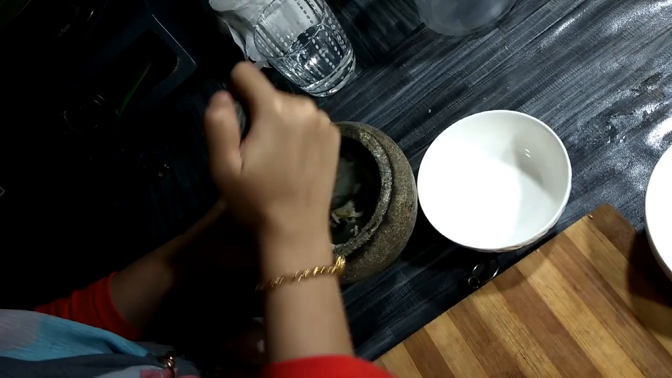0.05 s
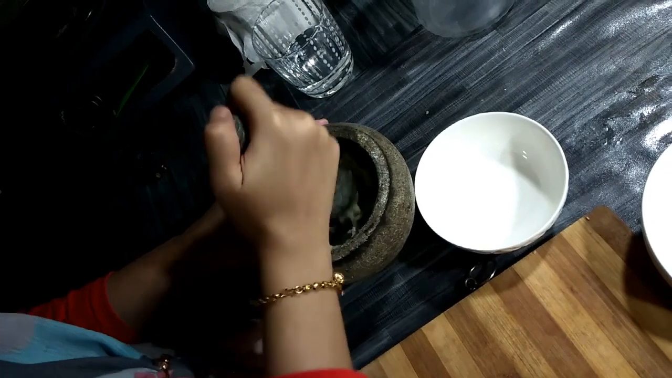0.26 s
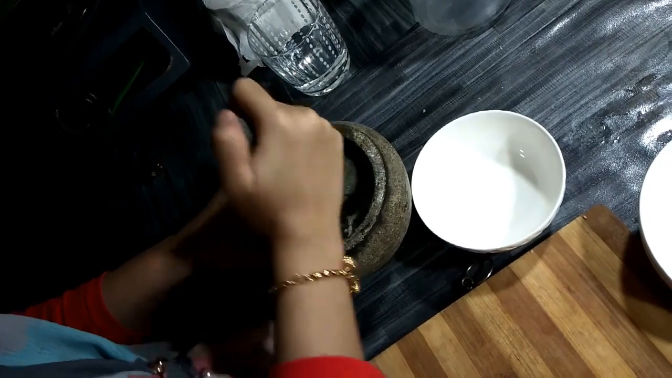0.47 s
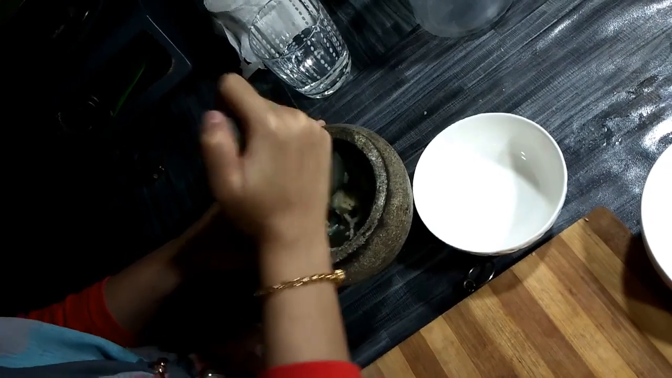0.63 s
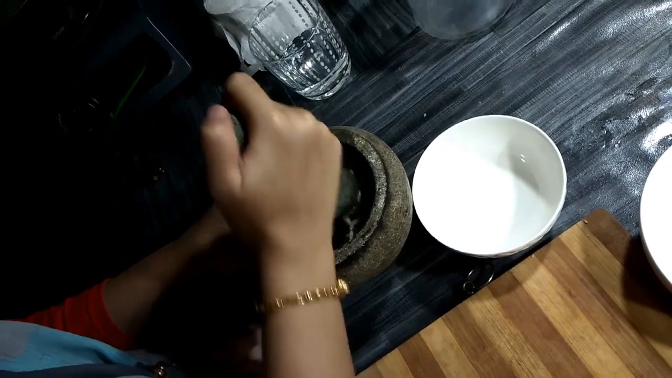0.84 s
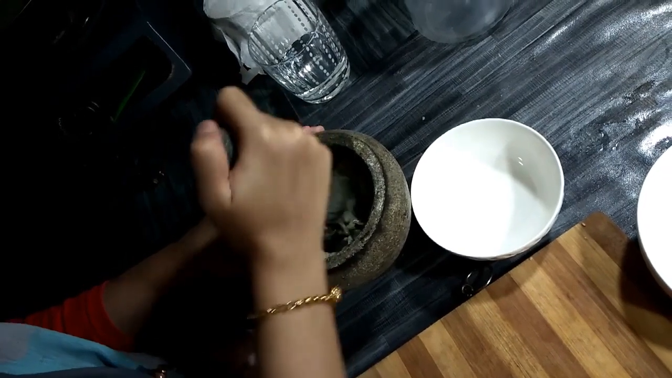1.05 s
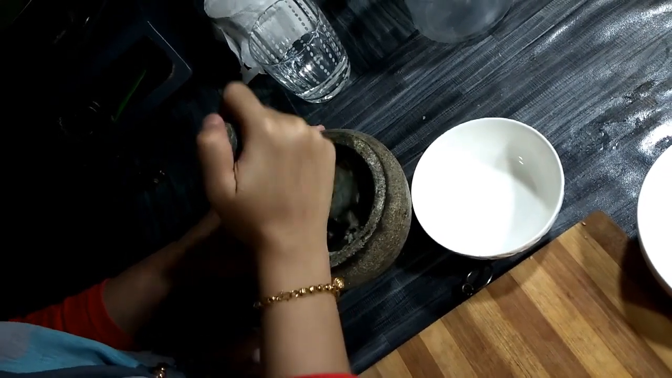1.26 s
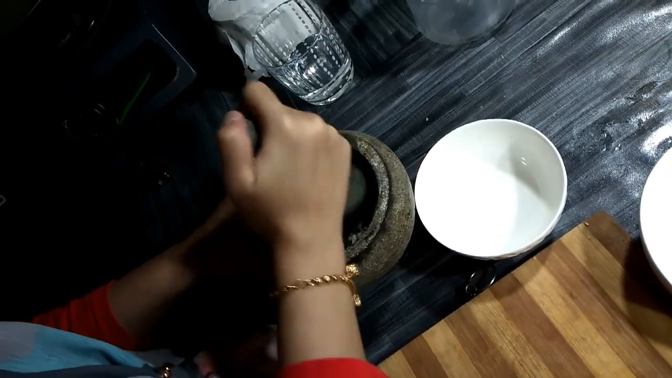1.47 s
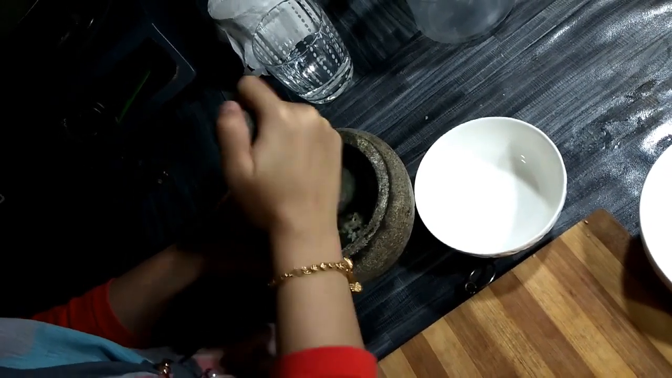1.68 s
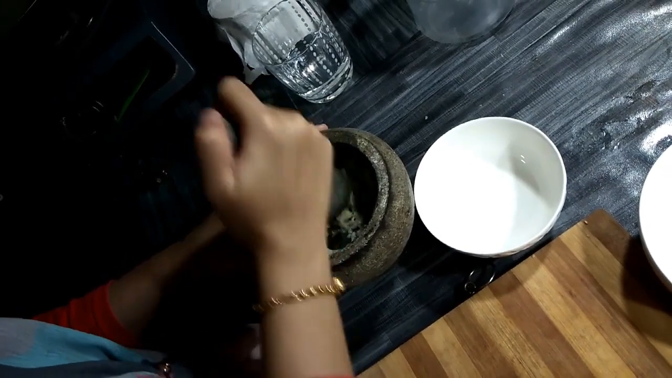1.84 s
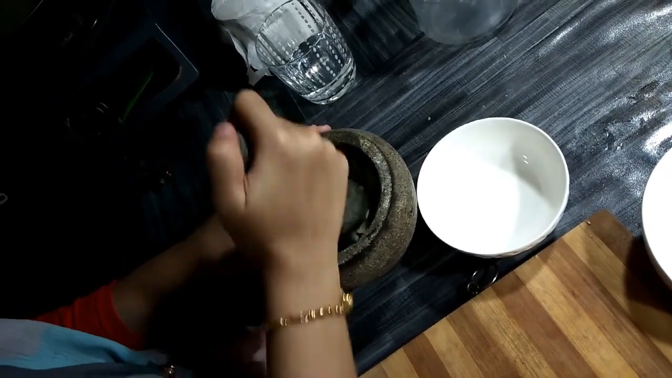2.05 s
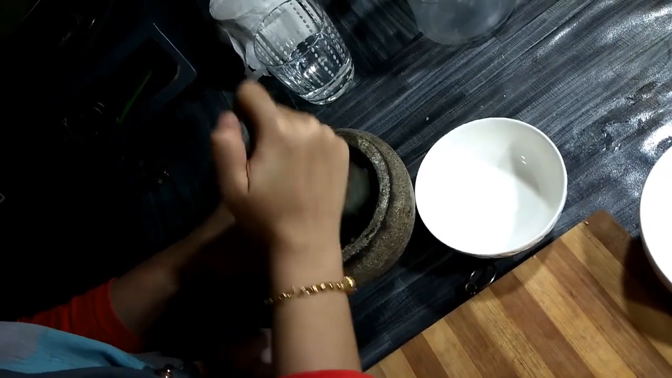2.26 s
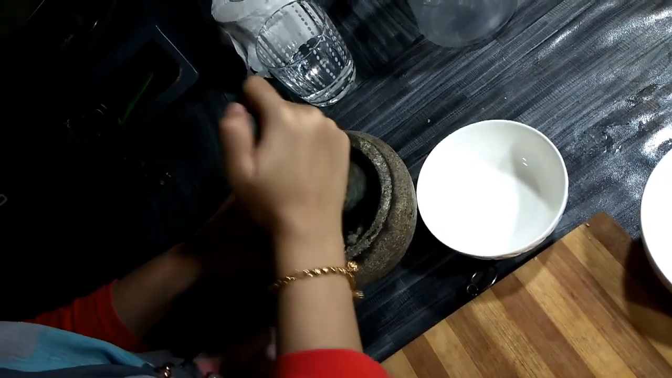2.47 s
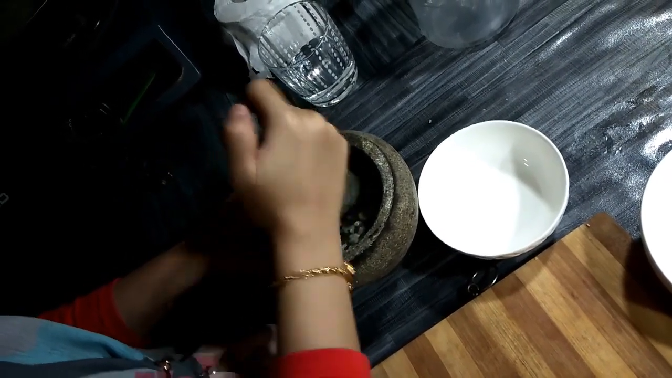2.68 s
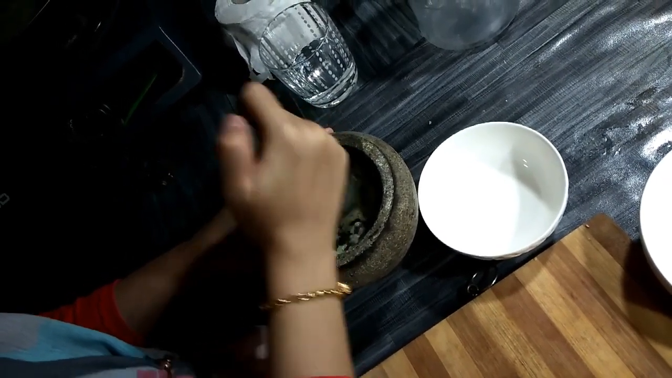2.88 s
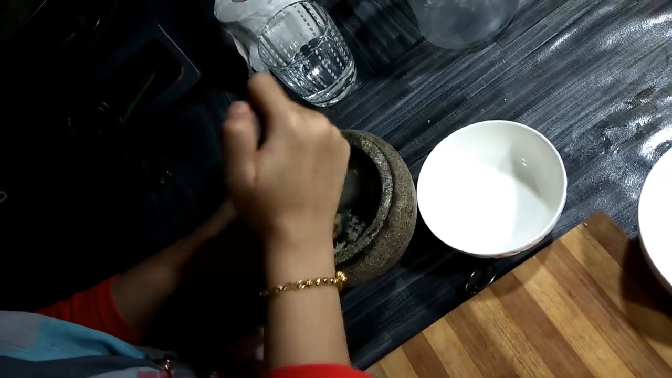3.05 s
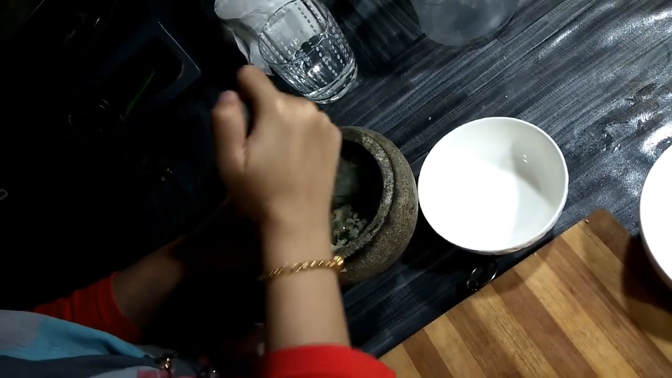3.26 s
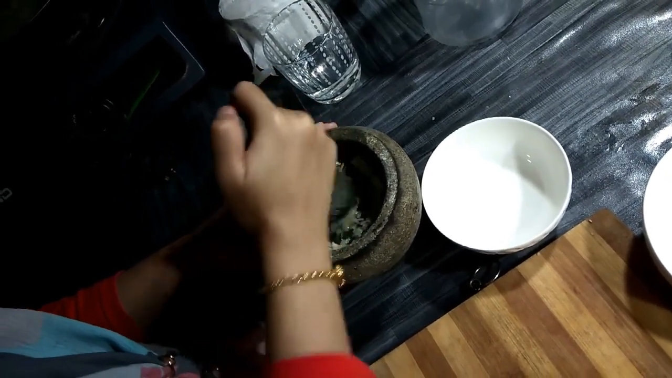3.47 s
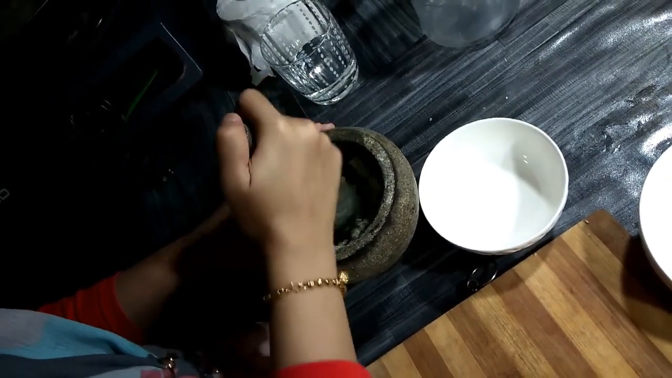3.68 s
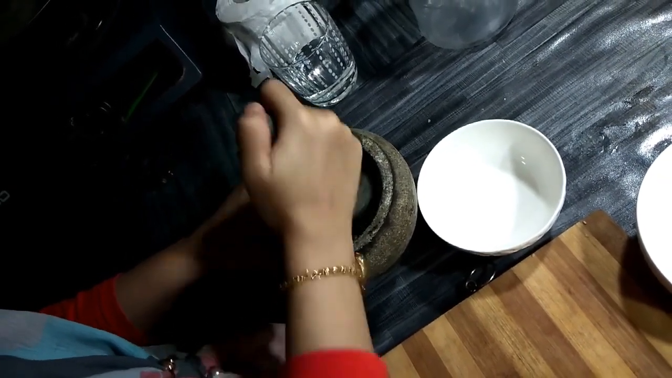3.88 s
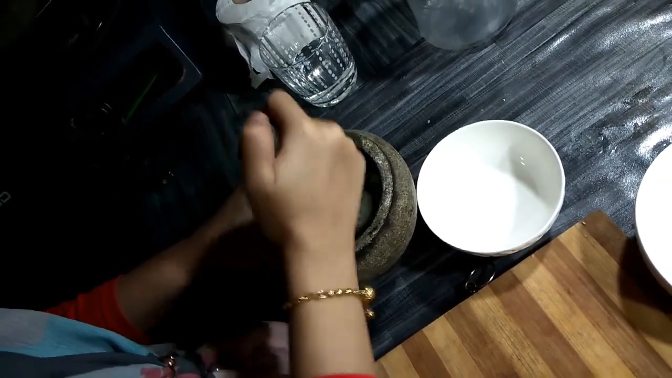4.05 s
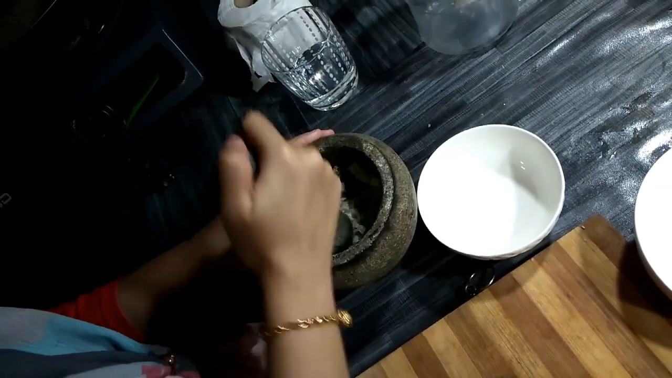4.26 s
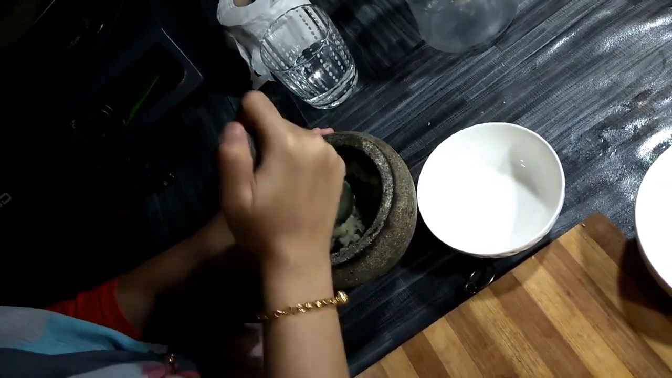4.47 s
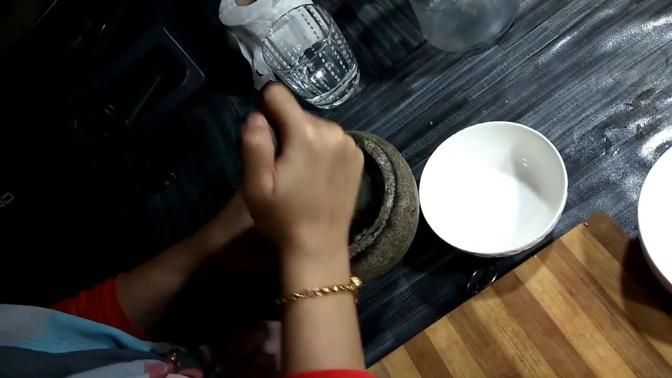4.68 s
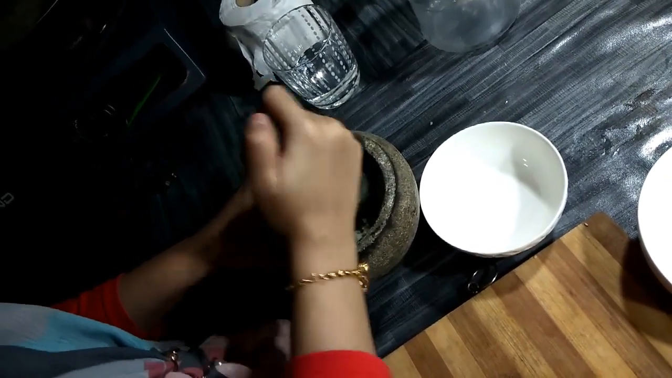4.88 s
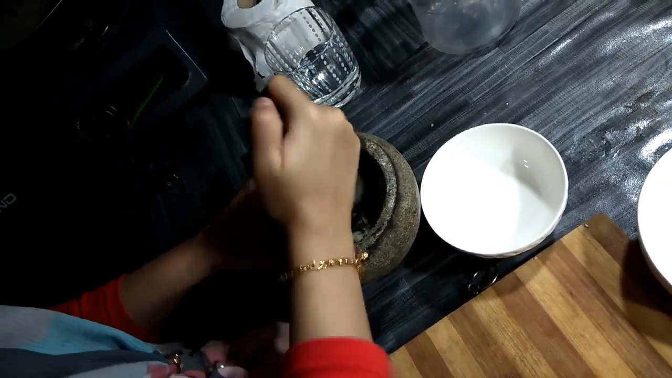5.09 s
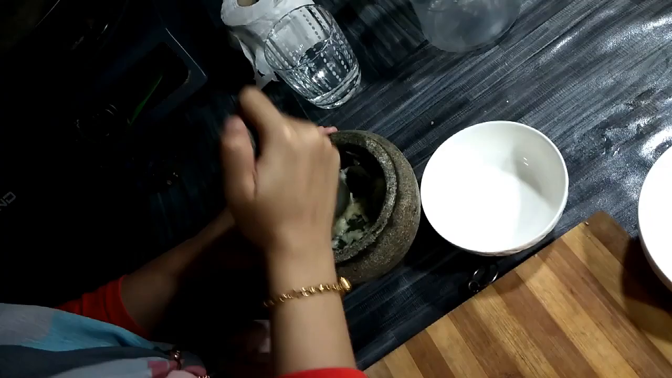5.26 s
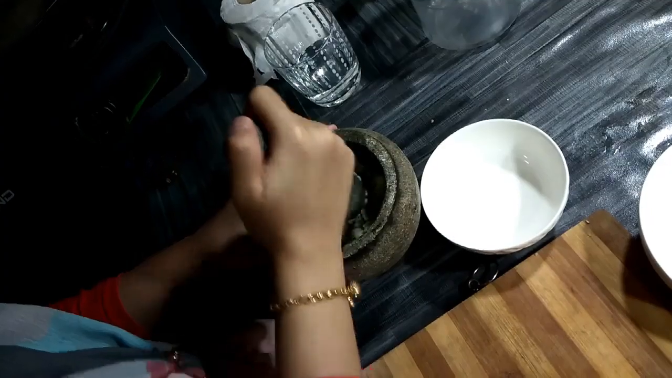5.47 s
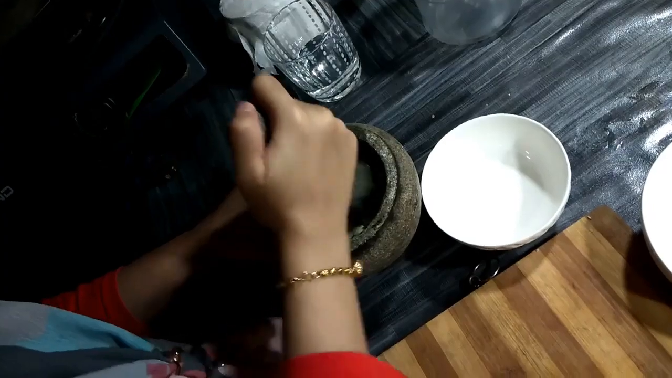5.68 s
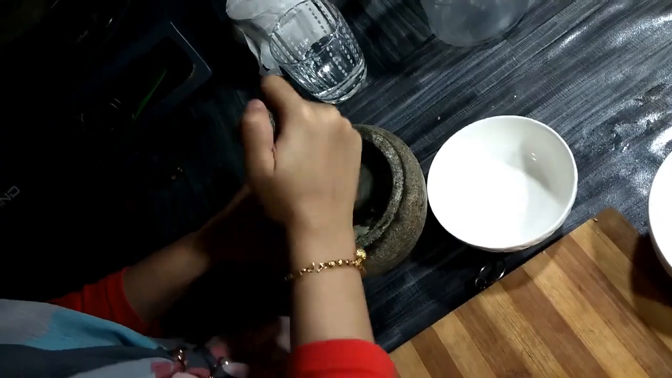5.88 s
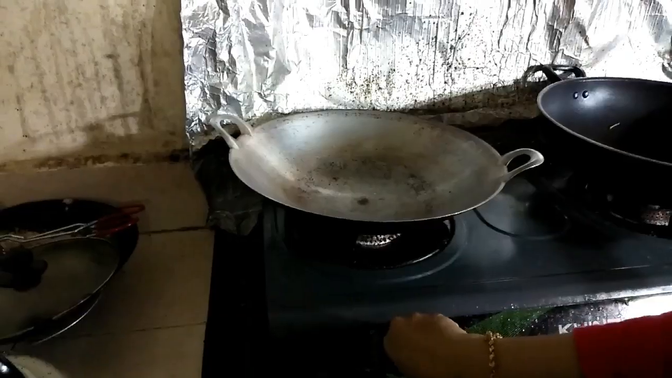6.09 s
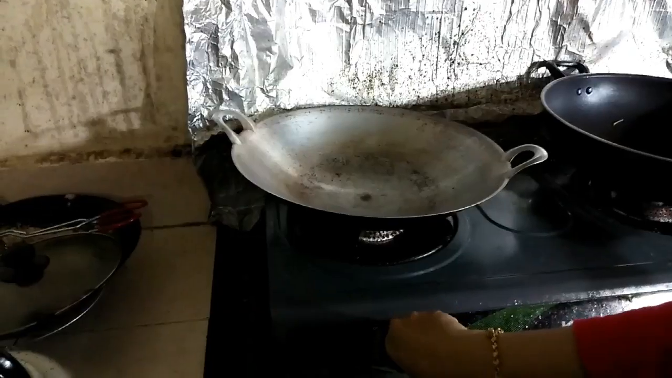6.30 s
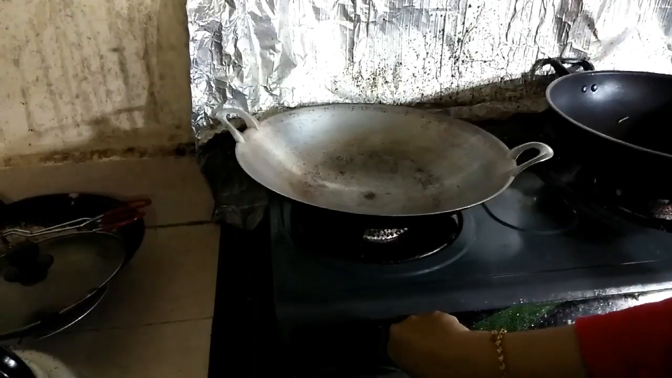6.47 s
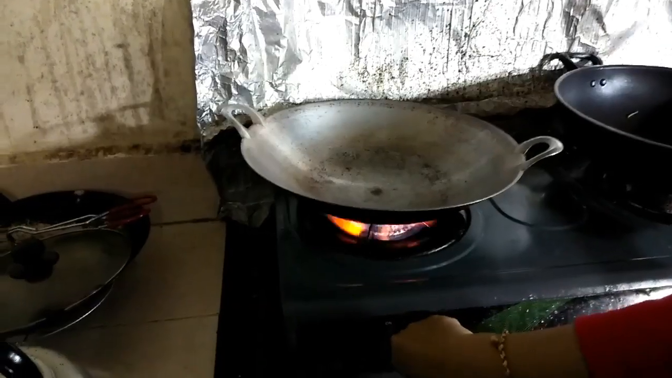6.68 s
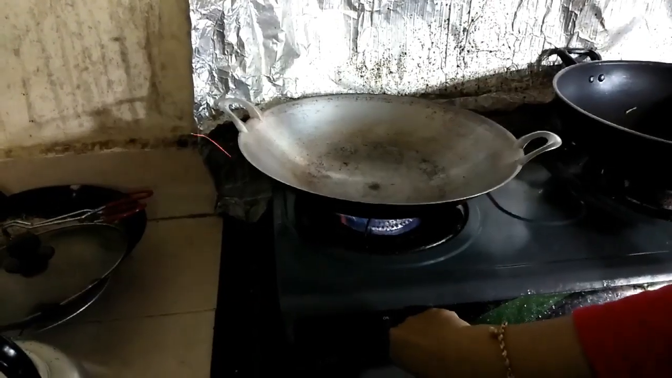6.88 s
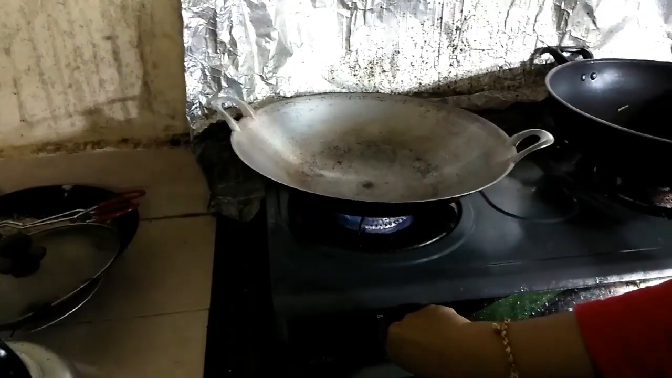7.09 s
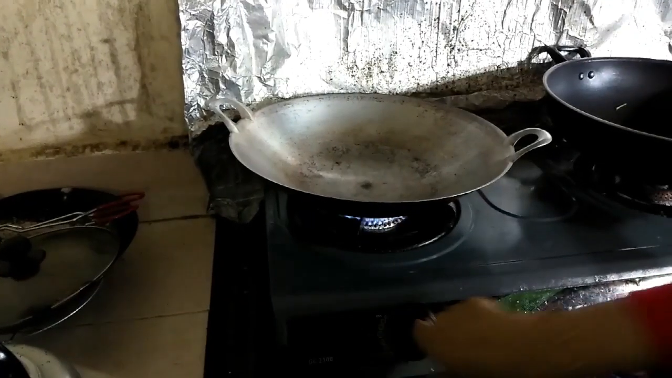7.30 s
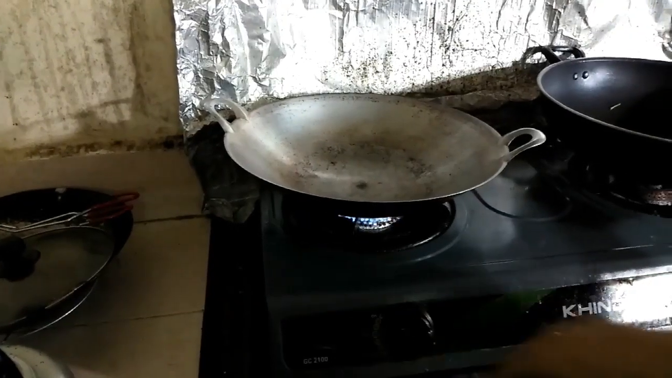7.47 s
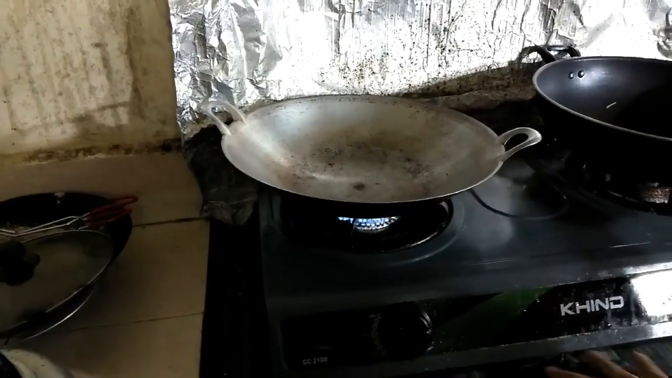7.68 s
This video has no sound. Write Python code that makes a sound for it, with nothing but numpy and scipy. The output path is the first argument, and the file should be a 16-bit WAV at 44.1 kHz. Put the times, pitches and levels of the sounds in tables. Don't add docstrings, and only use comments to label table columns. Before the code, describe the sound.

A pestle pounds garlic in a stone mortar with wet crunches, knocks, glass rattle and bracelet tinkle, then a gas stove snaps alight.

```python
import sys
import numpy as np
from scipy import signal
from scipy.fft import rfft, irfft, next_fast_len
from scipy.io import wavfile
from scipy.ndimage import uniform_filter1d, map_coordinates

SR = 44100
rng = np.random.default_rng(int(sys.argv[2]) if len(sys.argv) > 2 else 0)


def persist_wave(psi):
    counts = np.round(np.clip(psi, -1, 1) * 32767).astype(np.int16)
    wavfile.write(sys.argv[1], SR, np.atleast_2d(counts).T)


def amplitude_ratio(level_db):
    exponent = np.asarray(level_db, float) / 20
    return 10 ** exponent


N = 341239
T = np.arange(N) / SR
CUT_S = 6.128

# pitch_hz, level_db per Hz
AIR_COLOURS = [
    [(15, -38), (65, -9), (100, -1.5), (240, -8.5), (300, -14), (900, -28), (1800, -17), (3350, -23.5),
     (3800, -38.5), (4300, -33), (6800, -31.5), (9000, -39.5), (12000, -56), (15500, -55)],
    [(15, -55), (50, -18), (100, -1), (300, -15.5), (900, -24), (1800, -15), (3800, -22.5), (4200, -38),
     (5200, -28), (6700, -29), (7800, -34.5), (9070, -32.5), (12000, -51), (15500, -48)],
]
AIR_LEVELS = [-47.5, -51.5]
# pitch_hz, width_hz, level_db
HISS_BANDS = [(4684, 160, -7.5), (5410, 91, -11), (6810, 500, -6), (7850, 200, -12), (8600, 200, -16)]
# time_s, pitch_hz, level_db
WHINE_PATH = [(0, 1588, -49), (0.801, 1590, -49), (1.051, 1700, -52), (1.17, 1720, -50), (1.4, 1450, -47),
              (1.65, 1468, -47), (1.85, 1753, -57.5), (2.1, 1700, -50), (2.5, 1580, -50), (4, 1591, -50),
              (4.6, 1620, -52), (5.1, 1556, -50), (5.4, 1650, -52), (6.122, 1650, -50), (6.134, 1790, -52),
              (6.62, 1952, -54), (7.1, 1766, -51.5), (7.74, 1770, -50.5)]
# multiple, width_hz, level_db
WHINE_ORDERS = [(1, 93, 1), (1.9, 207, -4.5)]
# delay_s, level_db
WALLS = [(.0018, -12), (.004, -11), (.0115, -8.5), (0.0088, -6.5), (0.0152, -8.5), (.024, -30), (.033, -18)]
# pitch_hz, t60_s
ROOM_DECAY = [(100, 0.7), (500, 0.5), (1500, 0.65), (3000, 0.61), (8000, 0.5), (15000, 0.48)]

# start_s, level_db, rattle_s, brightness_db per octave
IGNITER_SNAPS = [
    (6.731, -33, 0.0035, -4),
    (6.734, -10.5, 0.018, 2),
    (6.7445, -7, 0.0021, -3.5),
    (6.749, -14.5, 0.0097, -1.5),
    (6.757, -14, 0.0023, -3),
]
# start_s, level_db, rattle_s, brightness_db per octave
KNOB_CLICKS = [
    (7.436, -12, 0.013, 1.6),
    (7.448, -10, 0.0031, -1.5),
    (7.456, -37, 0.0049, -1.5),
]
# pitch_hz, level_db per Hz
IGNITER_COLOUR = [(40, -49), (75, -13), (276, -18), (474, -16.5), (1110, -11), (1240, -9.5), (2190, -7.5),
                  (2520, -8), (2970, -12.5), (4860, -19), (8540, -17), (15000, -38), (16500, -66)]
# pitch_hz, level_db per Hz
KNOB_COLOUR = [(59, -70), (100, -45), (324, -15), (669, -26), (1000, -12), (1240, -17), (1910, -2.5),
               (2630, -11.5), (3780, -18), (5090, -30.5), (7980, -28.5), (15100, -60), (16500, -83)]
# pitch_hz, level_db, t60_s
KNOB_MODES = [(1008, -30, .27), (1800, -15, .1), (1860, -28, .25), (340, -30, .08)]
# pitch_hz, level_db per Hz
FLAME_COLOUR = [(15, -19), (45, -8), (100, 1.5), (270, -0.5), (560, -7.5), (630, -9), (690, 0.5),
                (760, -9.5), (900, -16.5), (1400, -14.5), (3000, -57)]

# start_s, level_db
CHARM_STRIKES = [
    [(.1944, -55), (2.1605, -56), (4.337, -62), (4.5844, -57), (4.9894, -69), (5.3353, -59)],
    [(.0233, -61), (.1744, -57), (.3805, -51), (1.1644, -57), (1.4142, -52), (1.6344, -54), (2.6294, -59),
     (3.0964, -56), (3.1444, -54), (3.6162, -53)],
]
# pitch_hz, level_db, t60_s
CHARM_MODES = [
    [(5530, 9, 0.088), (13570, -14, .05)],
    [(8130, 3.5, .07), (15350, -26, .05)],
]
# start_s, level_db
BOWL_NUDGES = [
    (0.556, -47.5),
    (4.969, -34),
    (5.22, -51),
]
# pitch_hz, level_db, t60_s
BOWL_MODES = [(1243, 0, .5), (3120, -7, .25)]
# start_s, tone_db, clatter_db
GLASS_HOPS = [(0.0744, -38, -36), (0.3182, -39, -47), (.5781, -45, -42), (.84, -39, -36),
              (1.0846, -32.5, -35), (1.321, -34, -35), (1.565, -41.5, -39), (2.069, -32, -31),
              (2.8124, -38, -41), (3.0792, -37, -30), (3.3073, -48, -41), (3.528, -43, -47),
              (3.9946, -37, -33), (4.732, -31.5, -31), (5.246, -41, -48), (5.5104, -39, -33),
              (5.7555, -54, -33), (5.9933, -47, -31)]
# pitch_hz, level_db, t60_s
GLASS_TONE = [(4680, 0, .16), (4735, -6, .12)]
# pitch_hz, level_db, t60_s
GLASS_CLATTER = [(2720, -10, .06), (3610, -16, .07), (5990, -13, .07), (1830, -13, .2), (7600, -19, .05),
                 (9350, -19, .05), (10200, -25, .05), (12070, -25, .06), (14430, -27, .06)]

# start_s, knock_db, splat_db, boom_db, contact_ms
HARD_BLOWS = [
    (.816, -19.5, -34, -29, 0.74),
    (1.2936, -12, -28, -25, 0.71),
    (2.039, -25.5, -30, -25, 0.7),
    (2.283, -12, -22.5, -27, 0.63),
    (3.7235, -21.5, -41, -27.5, 0.76),
    (4.196, -28, -35.5, -35.5, 0.64),
    (4.413, -24.5, -38, -31.5, 0.63),
    (4.7044, -14.5, -27.5, -26, .64),
    (5.4851, -11, -30.5, -25, 0.69),
    (5.7274, -10, -24, -25.5, 0.67),
]
# start_s, knock_db, splat_db, boom_db, brightness_db per octave
CUSHIONED_BLOWS = [(.049, -39.5, -26, -27, 1.6), (.293, -37.5, -39, -29.5, 2),
                   (.556, -37, -28.5, -27.5, 0.8), (1.059, -32, -32, -25, 0.3),
                   (1.539, -38, -31.5, -28, -1.5), (1.772, -51, -31, -34, 0.8), (2.533, -41, -32, -29, 3),
                   (2.788, -37.5, -23, -27, 2.2), (3.052, -37, -26, -26, -1.5),
                   (3.284, -36.5, -23, -26.5, 6.5), (3.502, -31, -40.5, -29, 7),
                   (3.968, -34.5, -24.5, -26.5, 1), (4.964, -45, -25, -29.5, -0.4),
                   (5.2204, -39.5, -25, -28.5, 3.5), (5.966, -32.5, -36.5, -25.5, 0.5)]
# start_s, level_db
RIM_TAPS = [
    (2.522, -34),
    (4.969, -34.5),
]
# pitch_hz, level_db, t60_s
FLOOR_MODES = [(56.55, 2.5, 0.42), (63.35, 4.5, 0.32), (77.5, 8.5, 0.14), (100.6, 0.5, 0.31),
               (146.2, -2.5, 0.32), (152.1, -4, 0.32), (173.8, -1, 0.19), (233.4, -2.5, 0.17),
               (253, -18, 0.21), (305.5, -3.5, 0.14), (348.3, -5.5, 0.1), (396, -22, 0.19),
               (481.4, -11.5, 0.12)]
# pitch_hz, width_hz, level_db
STONE = [(1267, 192, -4.5), (1650, 390, -1.5), (2220, 700, 4), (2895, 304, 11)]
# pitch_hz, width_hz, level_db
BODY = [(252.5, 225, 3.5), (324.6, 93, 8), (409, 118, -0.5), (540, 81, 1), (642, 104, 1.5), (806, 150, 5),
        (914, 270, -0.5)]
# pitch_hz, level_db per Hz
SPLAT_COLOUR = [(880, -9.5), (1500, 4), (2210, -3), (2540, 2.5), (4160, -10), (6890, -7.5), (8320, -9),
                (11000, -19), (16000, -32)]
# pitch_hz, width_hz, level_db
POP = [(6730, 780, -4), (9750, 3100, -24), (5370, 910, -6.5), (2050, 350, 0.5)]

HARD_BRIGHT_DB = 1.9
USUAL_BOOM_DB = -26.5


def unit(x):
    return x / np.sqrt(np.mean(x ** 2) + 1e-20)


def along(points, hz):
    f, v = np.transpose(points)
    return np.interp(np.log(hz + 1), np.log(f + 1), v)


def tilted(spectrum, bright_db, pivot_hz):
    return [(hz, db + bright_db * np.log2(hz / pivot_hz)) for hz, db in spectrum]


def resonant(peaks, f):
    total = 0
    for k, (centre, width, db) in enumerate(peaks):
        damping = 1j * f * width
        total = total + (-1) ** k * amplitude_ratio(db) * damping / (centre * centre - f * f + damping)
    return total


def filtered(x, response):
    size = next_fast_len(len(x) + 8192)
    return irfft(rfft(x, size) * response(np.fft.rfftfreq(size, 1 / SR)), size)[:len(x)]


def noise(spectrum, size):
    return unit(filtered(rng.standard_normal(size), lambda hz: amplitude_ratio(along(spectrum, hz))))


def wobble(rate):
    knots = rng.standard_normal(int(N * rate / SR) + 4)
    return map_coordinates(knots, [T * rate])


def add(track, s, x):
    part = track[round(s * SR):][:len(x)]
    part += x[:len(part)]


def ring(modes, cycles, scatter_db):
    t = T[:round(SR * max(t60 for _, _, t60 in modes))]
    out = np.zeros(len(t))
    for hz, db, t60 in modes:
        swell = 1 - np.exp(-t * hz / cycles)
        strength = amplitude_ratio(db + scatter_db * rng.standard_normal())
        out += strength * swell * amplitude_ratio(-60 * t / t60) * np.sin(2 * np.pi * hz * t)
    return out


def puff(spectrum, rise, t60, grit_db):
    t = T[:SR // 8]
    grit = unit(uniform_filter1d(rng.standard_normal(len(t)), size=round(.0012 * SR)))
    burst = unit(amplitude_ratio(grit_db * grit) * noise(spectrum, len(t)))
    return burst * (1 - np.exp(-t / rise)) * amplitude_ratio(-60 * t / t60)


def in_room(x, wet_db, colour=None, echo_db=0):
    hz, t, z = signal.stft(rng.standard_normal(SR * 3 // 4), SR, nperseg=256)
    decay = amplitude_ratio(-60 * t / along(ROOM_DECAY, hz)[:, None])
    tail = signal.istft(z * decay, SR, nperseg=256)[1]
    tail *= 1 - np.exp(-T[:len(tail)] / 0.00087)
    echoes = np.zeros(len(tail))
    echoes[0] = 1
    for s, db in WALLS:
        echoes[round(s * SR)] += amplitude_ratio(db + echo_db)
    if colour is None:
        return signal.fftconvolve(x, echoes + tail * amplitude_ratio(wet_db) / np.linalg.norm(tail))
    tail = filtered(tail, lambda f: amplitude_ratio(along(colour, f)))
    wet = tail * amplitude_ratio(wet_db) * np.linalg.norm(x) / np.linalg.norm(tail)
    return signal.fftconvolve(x, echoes)[:len(tail)] + wet


def room_air(level_db, colour):
    return amplitude_ratio(level_db + 0.63 * wobble(5.9)) * noise(colour, N)


def appliance():
    def bands(f):
        return sum(resonant([(hz, width, db / 2)], f) ** 2 for hz, width, db in HISS_BANDS)

    hiss = unit(filtered(rng.standard_normal(N), bands))
    return amplitude_ratio(-65.0 + 0.88 * wobble(3.4)) * hiss


def whine():
    s, hz, db = np.transpose(WHINE_PATH)
    phase = 2 * np.pi * np.cumsum(np.interp(T, s, hz)) / SR
    out = np.zeros(N)
    for multiple, width_hz, level_db in WHINE_ORDERS:
        def lowpass(f):
            return 1 / (1 + (f / width_hz) ** 2)

        a = unit(filtered(rng.standard_normal(N), lowpass))
        b = unit(filtered(rng.standard_normal(N), lowpass))
        band = a * np.cos(multiple * phase) + b * np.sin(multiple * phase)
        out += amplitude_ratio(level_db + 0.17 * wobble(5.0)) * band
    return amplitude_ratio(np.interp(T, s, db)) * unit(out)


def snaps(rows, colour, modes, wet_db):
    dry = np.zeros(SR // 2)
    first = rows[0][0]
    for s, db, rattle_s, bright_db in rows:
        bright = tilted(colour, bright_db, pivot_hz=3000)
        add(dry, s - first, amplitude_ratio(db) * puff(bright, rise=0.00062, t60=5 * rattle_s, grit_db=-0.4))
    out = np.zeros(N)
    add(out, first, in_room(dry, wet_db, colour, echo_db=-8.5))
    add(out, first + .004, ring(modes, cycles=3, scatter_db=0))
    return out


def flame():
    catch_s, catch_rise_s, flare_db, flare_s = 6.74, 0.024, 12.5, 0.18
    turned_down_s, down_db_per_s = 7.5, 52
    lit = np.maximum(T - catch_s, 0)
    level_db = -48.5 + flare_db * np.exp(-lit / flare_s)
    level_db = level_db - down_db_per_s * np.maximum(T - turned_down_s, 0)
    flutter = amplitude_ratio(level_db + 2.5 * wobble(15)) * noise(FLAME_COLOUR, N)
    return flutter * (1 - np.exp(-(lit / catch_rise_s) ** 2))


def stove():
    igniter = snaps(IGNITER_SNAPS, IGNITER_COLOUR, [(2490, -42, .06)], wet_db=-1.5)
    knob = snaps(KNOB_CLICKS, KNOB_COLOUR, KNOB_MODES, wet_db=-3.0)
    return flame() + igniter + knob


def blows():
    hard = [(s, splat, boom, HARD_BRIGHT_DB) for s, _, splat, boom, _ in HARD_BLOWS]
    cushioned = [(s, *rest) for s, _, *rest in CUSHIONED_BLOWS]
    return sorted(hard + cushioned)


def chain():
    low_hz, high_hz = 4980, 14900
    first_s, last_s = .012, .09
    out = np.zeros(N)
    for s, *_ in blows():
        for lag, pitch, size in rng.uniform(size=(6, 3)):
            hz = low_hz * (high_hz / low_hz) ** pitch
            link = ring([(hz, -57 - 9 * pitch - 8 * size, 0.049)], cycles=6, scatter_db=6)
            add(out, s + first_s + lag * (last_s - first_s), link)
    return out


def charms():
    out = np.zeros(N)
    for strikes, modes in zip(CHARM_STRIKES, CHARM_MODES):
        faint = [(s + rng.uniform(0.037, 0.21), -65 + 2 * rng.standard_normal()) for s, *_ in blows()]
        for s, db in strikes + faint:
            add(out, s, amplitude_ratio(db) * ring(modes, cycles=15, scatter_db=1))
    return out


def bowl():
    out = np.zeros(N)
    for s, db in BOWL_NUDGES:
        add(out, s, amplitude_ratio(db) * ring(BOWL_MODES, cycles=5, scatter_db=0))
    return out


def glass():
    out = np.zeros(N)
    for s, tone_db, clatter_db in GLASS_HOPS:
        tone = ring(GLASS_TONE, cycles=6, scatter_db=0)
        damping = 1 + (T[:len(tone)] / 0.038) ** 6
        add(out, s, amplitude_ratio(tone_db - 4.5) * tone / damping)
        add(out, s, amplitude_ratio(clatter_db - 0.2) * ring(GLASS_CLATTER, cycles=4.6, scatter_db=5.0))
        add(out, s, amplitude_ratio(clatter_db - 6) * puff(SPLAT_COLOUR, rise=0.0024, t60=0.098, grit_db=7.0))
    return out


def floor_boom():
    out = np.zeros(N)
    for s, _, boom_db, _ in blows():
        s -= .0028
        deep_db = 0.2 * min(boom_db - USUAL_BOOM_DB, 0)
        modes = [(hz, db + deep_db * (hz < 90), 0.86 * t60) for hz, db, t60 in FLOOR_MODES]
        add(out, s + 0.00382, amplitude_ratio(boom_db - 1.7) * ring(modes, cycles=0.92, scatter_db=2.0))
        add(out, s + .0335, amplitude_ratio(boom_db - 5) * ring(modes, cycles=1.65, scatter_db=5.5))
    return out


def garlic():
    out, t = np.zeros(N), T[:SR // 20]
    for s, splat_db, _, bright_db in blows():
        colour = tilted(SPLAT_COLOUR, bright_db, pivot_hz=6000)
        burst = rng.standard_normal(len(t)) * np.exp(-((t - .0015) / 0.0012) ** 2)
        pop = filtered(burst, lambda f: resonant(POP, f) * ((f + 1) / 6000) ** (bright_db / 6))
        splat = amplitude_ratio(-11.5) * puff(colour, rise=0.002, t60=0.051, grit_db=-2.5)
        add(splat, 0, pop / np.abs(pop).max())
        wet = in_room(splat, wet_db=-1.5, colour=colour, echo_db=-3.0)
        add(out, s - .0028, amplitude_ratio(splat_db + 2.5) * wet)
    return out


def knocks():
    contacts = []
    for s, db, _, boom_db, contact_ms in HARD_BLOWS:
        body_db = -13.5 + 1.63 * (boom_db - USUAL_BOOM_DB)
        contacts.append((s, db, contact_ms, body_db - db))
    contacts += [(s, db, 1.5, -7) for s, db, *_ in CUSHIONED_BLOWS]
    return contacts + [(s, db, 0.78, -4) for s, db in RIM_TAPS]


def stone_knock():
    out, t = np.zeros(N), T[:SR // 20]
    for s, db, contact_ms, body_db in knocks():
        force = np.sin(np.pi * np.clip(1000 * t / contact_ms, 0, 1)) ** 2
        knock = filtered(-force, lambda f: resonant(STONE, f) + amplitude_ratio(body_db - 10.5) * resonant(BODY, f))
        knock = knock / np.abs(knock).max()
        add(out, s, amplitude_ratio(db + 7.5) * in_room(knock, wet_db=-1.63, echo_db=-1.0))
    return out


def scene():
    before = np.clip((CUT_S - T) / 0.0033, 0, 1)
    mortar_air, stove_air = [room_air(db, colour) for db, colour in zip(AIR_LEVELS, AIR_COLOURS)]
    pounding = floor_boom() + garlic() + stone_knock()
    mortar = mortar_air + chain() + charms() + bowl() + glass() + pounding
    mix = before * mortar + (1 - before) * stove_air
    return (mix + appliance() + whine() + stove())[None]


def roll_off(x):
    return signal.sosfilt(signal.butter(12, 16640, fs=SR, output="sos"), x)


def record(dry):
    top_hz, low_hz = 15600, 42

    def band(hz):
        width = low_hz * np.sqrt(2)
        low_cut = resonant([(low_hz, width, 0)], hz) * 1j * hz / width
        return low_cut / (1 + (hz / top_hz) ** 150)

    mix = filtered(dry[0], band)[None]
    return roll_off(mix)


dry = scene()
out = record(dry)
persist_wave(out)
```